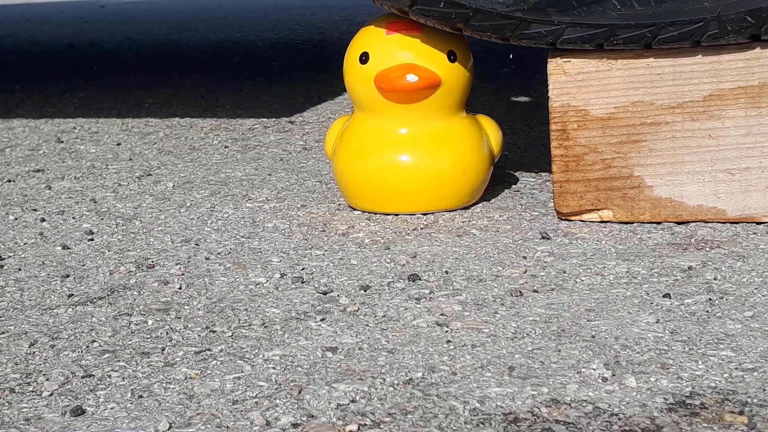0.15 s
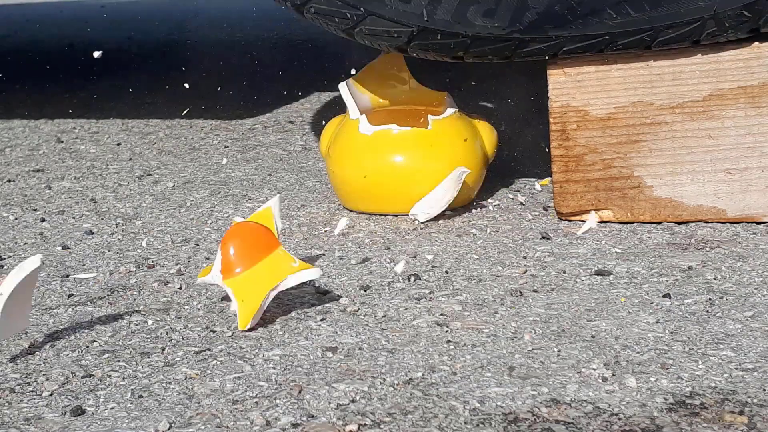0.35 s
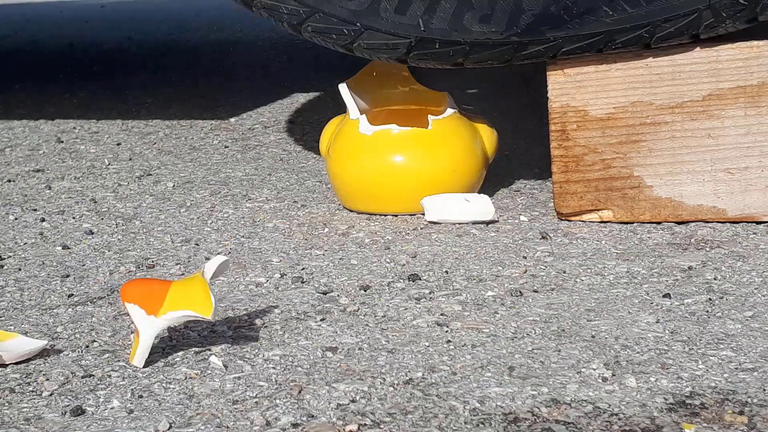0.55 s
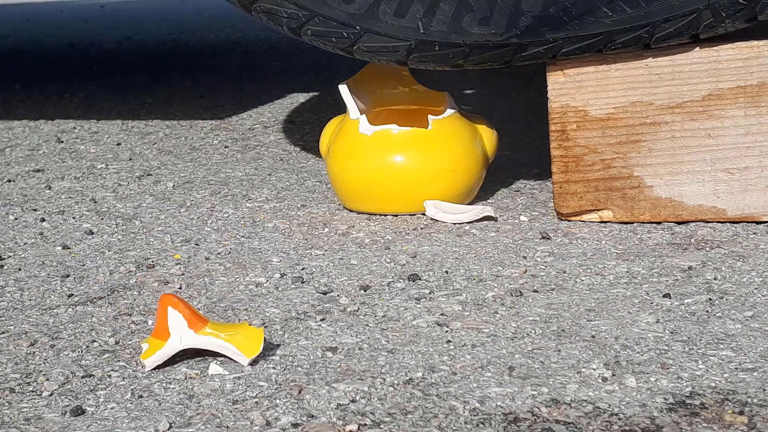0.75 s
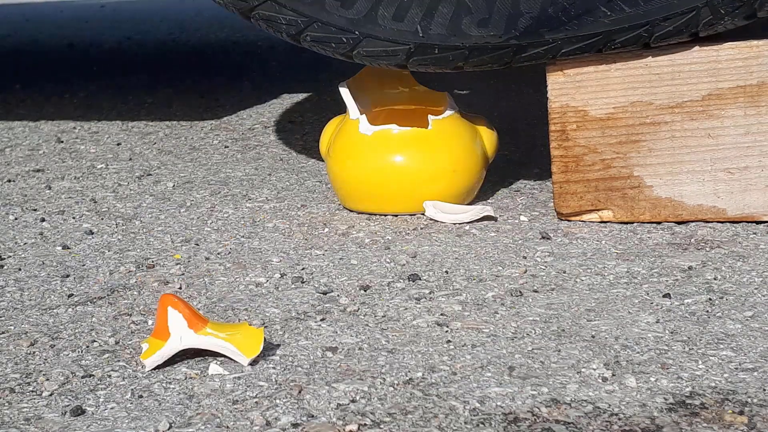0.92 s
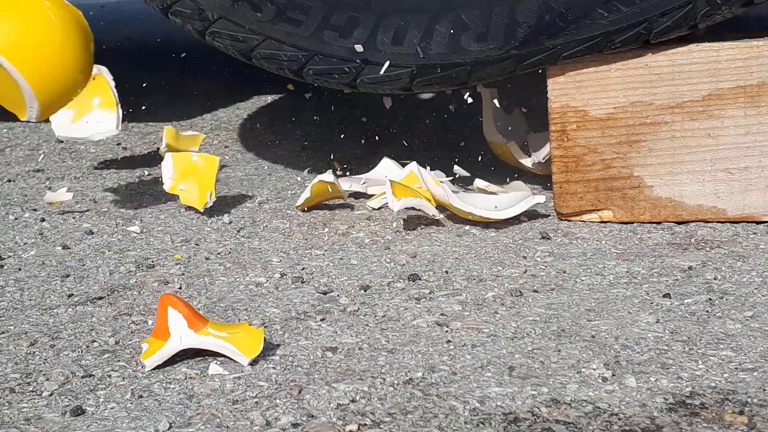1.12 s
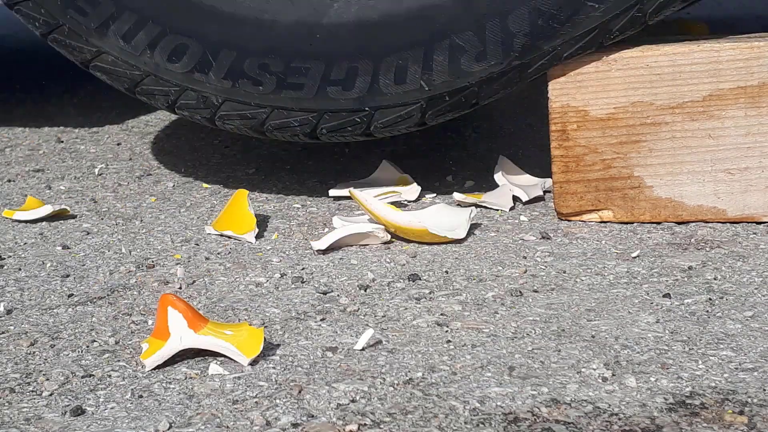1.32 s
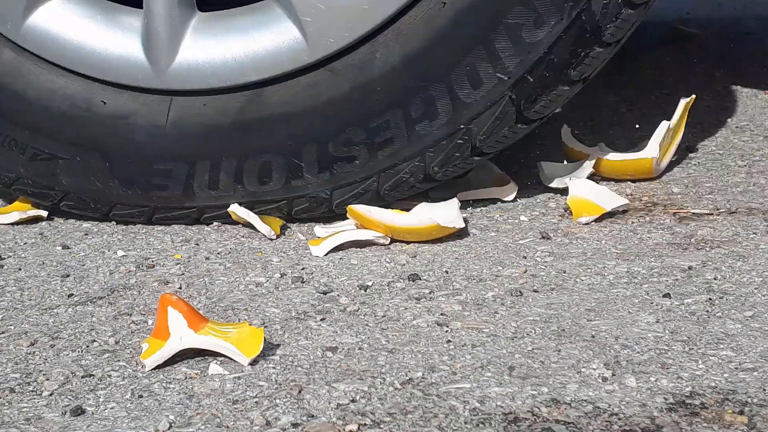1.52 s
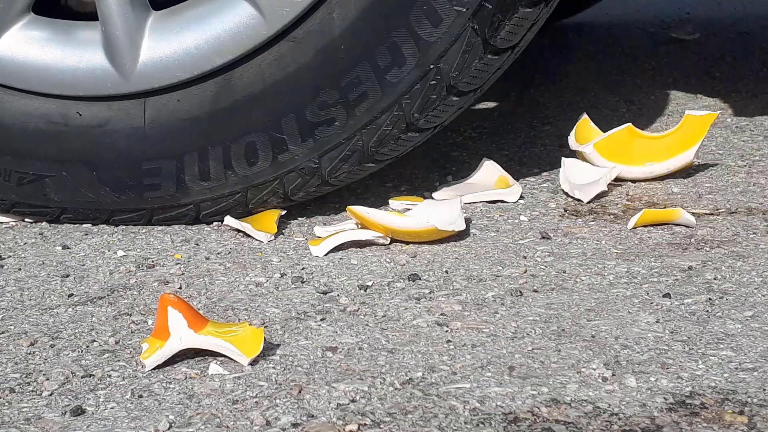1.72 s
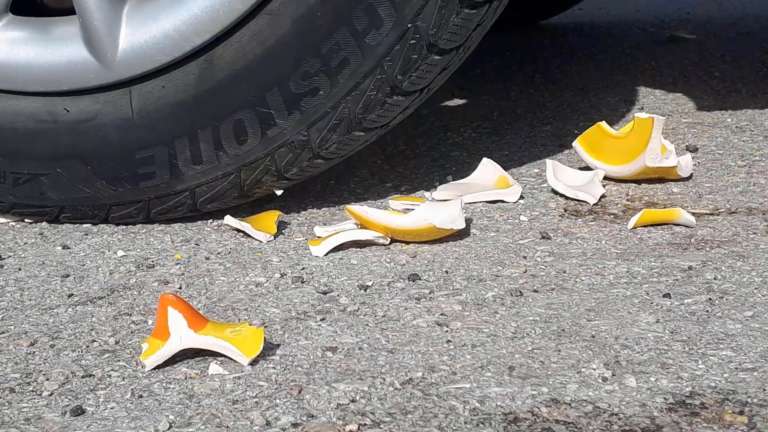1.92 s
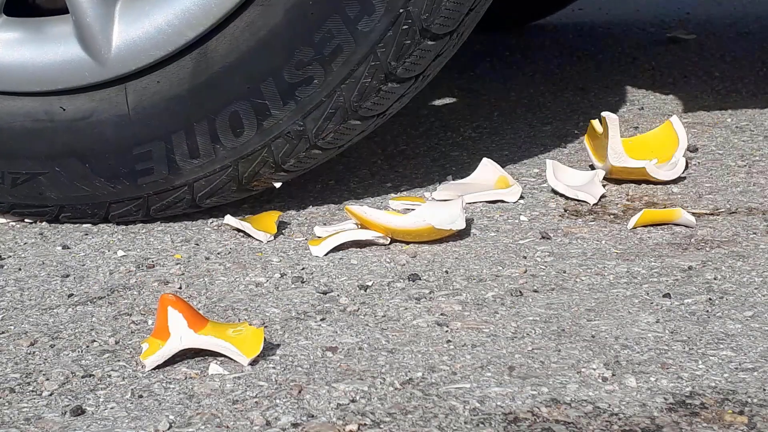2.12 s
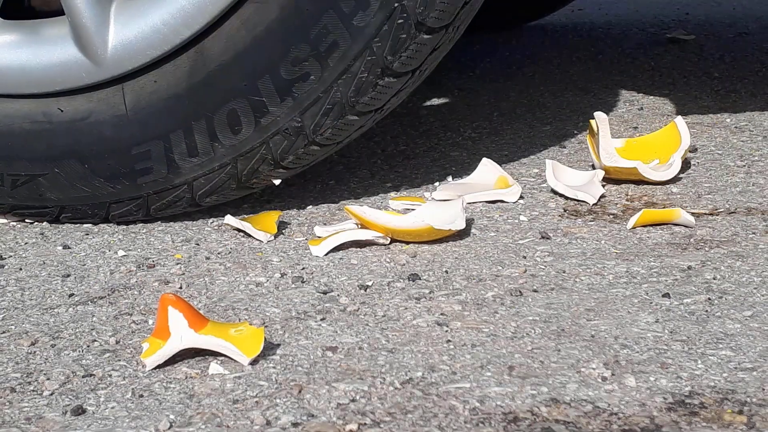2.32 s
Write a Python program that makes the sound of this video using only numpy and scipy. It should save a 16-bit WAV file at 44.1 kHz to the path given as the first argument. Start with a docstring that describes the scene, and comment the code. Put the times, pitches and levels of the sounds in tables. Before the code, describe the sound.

Ceramic shatters under a car tyre, heard close on asphalt. An engine idles low, then at 0.23 s a loud, hollow crack bursts into bright splinters, with a brief tyre hum. Shards clink and tick sparsely until 1.0 s over a fainter engine. A second smash hits at 1.1 s, a sharp clink at 1.38, tyre thud and crunching around 1.5-1.8, then faint rocking rattles until 2.3.

```python
"""An engine idles close by; a hollow ceramic figure breaks twice under a car tyre on asphalt, then the tyre
drops to the ground and grinds the pieces. Bursts of crackling noise, snaps and pings make the breaks; shards land
and ring as decaying sines, with dry ticks and crumbs; the bowl-shaped base rocks to rest in a chord of modes.
The air in the tyre hums after the jolts. The engine, low sines over gated noise, is fainter after the first break."""
import sys
import numpy as np
from scipy import signal
from scipy.fft import rfft, irfft, next_fast_len
from scipy.io import wavfile
from scipy.ndimage import map_coordinates

SR = 44100
rng = np.random.default_rng(int(sys.argv[2]) if len(sys.argv) > 2 else 0)


def waveform_to_disk(signal):
    """Save audio, clipped to [-1, 1], as 16-bit WAV at the path in sys.argv[1]."""
    frames = np.transpose(np.atleast_2d(signal))
    scaled = np.clip(frames, -1, 1) * 32767
    samples = np.round(scaled).astype(np.int16)
    wavfile.write(sys.argv[1], SR, samples)


N = 103635
T = np.arange(N) / SR  # s


def amp(db):
    """Decibels to a linear gain."""
    return 10 ** (np.asarray(db) / 20)


def unit(x):
    """x scaled to an rms of 1."""
    return x / np.sqrt(np.mean(x ** 2) + 1e-20)


def along(points, hz):
    """Interpolates (frequency [Hz], value) points on a log frequency axis."""
    point_hz, value = np.transpose(points)
    return np.interp(np.log(hz + 1), np.log(point_hz + 1), value)


def wobble(rate):
    """A smooth random curve, rate knots a second."""
    knots = rng.standard_normal(int(N * rate / SR) + 4)
    return map_coordinates(knots, [T * rate])


def filtered(x, response):
    """Shapes the spectrum of x by a response of frequency."""
    size = next_fast_len(N + 8192)
    hz = np.fft.rfftfreq(size, 1 / SR)
    return irfft(rfft(x, size) * response(hz), size)[..., :N]


def band(x, lo_hz, hi_hz):
    """Causal band-pass."""
    return signal.sosfilt(signal.butter(2, [lo_hz, hi_hz], "bandpass", fs=SR, output="sos"), x)


# How alike left and right are: (frequency [Hz], likeness [0-1])
STEREO_LIKENESS = [(30, 1), (120, 1), (1000, 0.57), (8000, 0.46), (16000, 0.32)]


def noise():
    """White stereo noise, mixed from mid and side so the channels are less alike at high frequencies."""
    def mid_side_gains(hz):
        angle = np.arccos(np.clip(along(STEREO_LIKENESS, hz), 0, 1)) / 2
        return np.array([np.cos(angle), np.sin(angle)])

    mid, side = filtered(rng.standard_normal((2, N)), mid_side_gains)
    return np.array([mid + side, mid - side])


RISE_CYCLES = 0.32  # time constant of the attack: a ring builds up over about a cycle


def add(out, s, db, hz, t60, pan_db):
    """Adds one struck mode: a decaying sine, panned by its left over right level."""
    start, t = round(s * SR), T[:round(1.2 * t60 * SR)]
    decay = amp(db - 60 * t / t60)
    ring = decay * (1 - np.exp(-t * hz / RISE_CYCLES)) * np.sin(2 * np.pi * hz * t)
    sides = amp([[pan_db / 2], [-pan_db / 2]])
    out[:, start:start + len(t)] += (sides * ring)[:, :N - start]


PING_SPREAD, PING_PAN_DB = 0.77, 2.5  # scatter of log pitch; scatter of each side's level, opposite ways
PING_SIZE_DB, PING_MAX_DB = 8.5, 12  # mean of the random size before the cap; the cap


def pings(count, centre_hz, life_cycles):
    """Many tiny damped sines of random time, pitch, life, size and place, rms 1."""
    u, g = rng.random((count, 3)), rng.standard_normal((count, 2))
    hz = np.clip(centre_hz * np.exp(PING_SPREAD * g[:, :1]), 500, 16000)
    k = np.arange(600)  # samples in a ping
    cycles = hz * k / SR
    size = amp(np.minimum(-PING_SIZE_DB * np.log(u[:, 1:2]), PING_MAX_DB))
    life = life_cycles * (0.076 + u[:, 2:] ** 2)
    fade = 1 - k / len(k)
    ping = size * np.exp(-cycles / life) * np.sin(2 * np.pi * cycles) * fade
    at = ((u[:, :1] * N).astype(int) + k).ravel()
    sides = [amp(side * PING_PAN_DB * g[:, 1:]) for side in (1, -1)]
    return unit(np.array([np.bincount(at, (ping * gain).ravel())[:N] for gain in sides]))


# Breaks and grinding bursts: (time [s], rise [s], hold [s], body and crack t60 [s],
# thump level [dB], body level [dB], crack level [dB], splinter level [dB])
BURSTS = [(0.2333, 0.0011, 0.0034, 0.025, -57, -46, -30, -28.5),
          (0.247, 0.00089, 0.003, 0.07, -53, -11, -14.5, -25),
          (0.293, 0.0053, 0.04, 0.17, -13, -16.5, -16, -14.5),
          (0.395, 0.0012, 0.007, 0.2, -48, -31.5, -37.5, -20.5),
          (1.106, 0.001, 0.013, 0.16, -20, -20, -16, -15.5),
          (1.492, 0.038, 0.0075, 0.056, -30, -22, -23.5, -25),
          (1.535, 0.0023, 0.008, 0.051, -31, -14.5, -29, -48),
          (1.565, 0.0015, 0.011, 0.5, -29, -33.5, -38.5, -42.5),
          (1.613, 0.0018, 0.026, 0.035, -60, -29, -28.5, -48),
          (1.652, 0.0012, 0.063, 0.14, -47, -31.5, -41, -52),
          (1.727, 0.0019, 0.025, 0.038, -36.5, -29.5, -42, -45),
          (1.778, 0.0032, 0.014, 0.24, -68, -36, -34.5, -44)]
# Thump, body, crack and splinter bands: (low edge [Hz], high edge [Hz])
BURST_BANDS = [(95, 342), (300, 1300), (1700, 5250), (6000, 18100)]
# Short knocks of the thick walls, small chips and the tyre: (time [s], level [dB], pitch [Hz], t60 [s])
WALL_KNOCKS = [(0.2495, -13.5, 382, 0.089), (0.2475, 11, 2160, 0.002), (.297, -4.5, 751, 0.045),
               (.305, -13.5, 487, 0.18), (0.316, -15.5, 91, 0.12), (0.332, -12, 117, .15),
               (0.35, -17, 161, 0.22), (.475, -30, 109.7, 0.19), (1.108, -7.5, 192, 0.073),
               (1.107, 5, 1047, 0.0075), (1.149, -21, 114.6, 0.18), (1.375, 2.5, 2660, 0.007),
               (1.392, -24, 10740, 0.046), (1.413, -33, 10740, 0.063), (1.534, -8, 4905, 0.02),
               (1.543, -10.5, 1424, 0.015), (1.539, -12, 245, 0.057), (1.598, -21, 144, 0.12),
               (1.615, -25.5, 70, 0.17), (1.675, -16.5, 636, 0.032), (1.677, -18.5, 332, 0.052),
               (1.74, -28, 1124, 0.022), (1.79, -20.5, 420, 0.017), (1.819, -6, 570, 0.0046),
               (1.9087, -3.5, 1060, 0.0036), (2.229, -20.5, 1920, 0.0056), (2.274, -19.5, 2070, 0.0088),
               (2.283, -25.5, 108, 0.076), (2.307, -21, 125, 0.062)]
T60_FACTORS = [1.27, 1, 1, 0.68]  # thump, body, crack, splinter
CRACKLE_HZ, CRACKLE_DB = 907.7, 5  # grain rate and depth of the noise
CHIP_COUNT, CHIP_DB, CHIP_HZ, CHIP_CYCLES = 2400, -9, 4525, 120  # ringing chips, level over the noise
GRIT_COUNT, GRIT_DB, GRIT_HZ, GRIT_CYCLES = 1600, -5.5, 3600, 1.9  # crisp snaps, level over the noise
KNOCK_PAN_DB = 2  # scatter of left over right


def breaks():
    """Each burst rises, holds and dies in four bands of crackling noise, snaps and ringing chips; knocks stand out."""
    out = np.zeros((2, N))
    chips = amp(CHIP_DB) * pings(CHIP_COUNT, CHIP_HZ, CHIP_CYCLES)
    snaps = amp(GRIT_DB) * pings(GRIT_COUNT, GRIT_HZ, GRIT_CYCLES)
    for k, (lo_hz, hi_hz) in enumerate(BURST_BANDS):
        shape = np.zeros(N)
        for s, rise, hold, t60, *db in BURSTS:
            attack = np.clip((T - s) / rise, 0, 1) ** 2
            dying_s = np.maximum(T - s - rise - hold, 0)
            shape += attack * amp(db[k] - 60 * dying_s / (t60 * T60_FACTORS[k]))
        crackle = unit(noise() * amp(CRACKLE_DB * wobble(CRACKLE_HZ)))
        out += shape * unit(band(crackle + chips + snaps, lo_hz, hi_hz))
    for knock, side in zip(WALL_KNOCKS, rng.standard_normal(len(WALL_KNOCKS))):
        add(out, *knock, KNOCK_PAN_DB * side)
    return out


# Landing shards, before the flutter: (time [s], level [dB], pitch [Hz], t60 [s], left over right [dB])
SHARD_RINGS = [(0.2995, -10.5, 3450, 0.028, 0), (0.301, -10.5, 2548, 0.15, 3), (0.314, -6, 2560, 0.08, -1),
               (0.3043, -13.5, 7920, 0.046, -10), (0.312, -4.5, 5060, 0.045, 4),
               (0.3106, -5.5, 6130, 0.057, -5), (0.342, -14, 4390, 0.073, 0),
               (0.3495, -9.5, 5620, 0.052, 5.5), (0.353, -13.5, 10560, 0.026, 3),
               (0.383, -27.5, 5560, 0.19, 3), (0.4, -31, 10930.0, 0.05, -9),
               (0.3981, -13.5, 12900, 0.037, 3), (0.4, -12, 13800, 0.056, -8),
               (0.4235, -21, 10750, 0.025, -2), (0.423, -10, 5010, 0.029, 2),
               (0.4516, -18.5, 5540, 0.038, 6), (0.403, -18, 4650, 0.012, 2),
               (0.456, -11, 13300, 0.032, -8), (0.508, -23, 14300, 0.024, -2),
               (0.5086, -21.5, 10140, 0.016, 1), (0.5445, -40, 10660.0, 0.021, -17),
               (0.5598, -13.5, 13830, 0.013, -8), (0.5774, -29.5, 7700, 0.014, -6),
               (0.578, -38, 10600, 0.05, -1.5), (0.5786, -33, 5500, 0.034, 6),
               (0.6665, -25, 13800, 0.02, -4), (0.6666, -13.5, 4978, 0.043, 8.5),
               (0.68, -44, 10400, 0.036, 0), (0.6935, -17.5, 4943, 0.047, 5.5),
               (0.712, -37, 10300, 0.092, -2), (0.7125, -32, 13800, 0.037, -14),
               (0.7357, -31, 13640, 0.031, -9), (0.76, -42, 10600, 0.11, -2), (0.8124, -34, 7810, 0.05, -9),
               (0.8292, -26.5, 4940, 0.079, 6), (0.843, -39, 12600, 0.045, 8),
               (0.882, -36, 13840, 0.034, -8), (0.9063, -35, 14300, 0.028, 7),
               (0.92, -35.5, 6960, 0.12, -4), (0.9215, -45, 10770.0, 0.13, 5),
               (0.9499, -32, 4900, 0.058, 7), (1.028, -14.5, 2540, 0.015, -4), (1.03, -33, 4980, 0.12, 5),
               (1.11, -7.5, 5200, 0.019, 1), (1.118, -8, 4830, 0.025, 5), (1.1217, -4, 3173, 0.074, 3),
               (1.135, -13, 4965, 0.038, 9), (1.134, -15, 4040, 0.028, 11), (1.15, -32, 3135, 0.1, 6),
               (1.1241, -14, 12400, 0.064, -1), (1.13, -19, 7020, 0.057, -18),
               (1.133, -14.5, 2412, 0.12, -2), (1.1631, -26, 15530.0, 0.05, -4),
               (1.202, -21, 3650, 0.067, 3), (1.201, -44, 8900, 0.066, 1), (1.2161, -28, 14440, 0.082, -4),
               (1.229, -38, 7230, 0.092, -16), (1.238, -22.5, 1757, 0.036, 1),
               (1.24, -23.5, 4000, 0.045, 1), (1.2396, -37, 13500, 0.059, 1),
               (1.243, -38, 8710.0, 0.057, -11), (1.2485, -49, 5016, 0.22, 15),
               (1.2906, -34, 15900, 0.062, -4), (1.292, -27, 2870, 0.035, 0), (1.2906, -25, 1690, 0.031, 4),
               (1.292, -34.5, 6900, 0.063, -8), (1.2965, -36, 11900, 0.045, 6),
               (1.3087, -20.5, 4940, 0.032, 2.5), (1.3103, -30.5, 10100, 0.039, -6),
               (1.334, -33, 2970, 0.062, 0), (1.3763, -23, 5195, 0.03, 7), (1.4133, -38, 15290.0, 0.11, 2),
               (1.4158, -37.5, 5010, 0.12, 20), (1.58, -31, 7570, 0.026, -9), (1.6182, -24.5, 1260, 0.2, 5),
               (1.758, -34, 1194, 0.087, -7), (1.822, -35, 1240, 0.05, -13),
               (1.8763, -32.5, 8760, 0.025, 2)]
# Modes of the bowl-shaped base: (pitch [Hz], relative level [dB], t60 [s], left over right [dB])
BASE_MODES = [(2412, -0.5, 0.2, 5), (3157, -6, 0.1, 11.5), (5240, -6.5, 0.07, 14), (8310, -18.5, 0.066, -5),
              (10740, -26, 0.039, 12), (12200, -22, 0.081, 3)]
# Blows on the rocking base, before scatter and flutter:
# (time [s], level [dB], extra on the lowest mode [dB], extra on the three highest modes [dB])
BASE_BLOWS = [(1.375, -9.5, -16.5, -3), (1.411, -22, -20, -14), (1.617, -25.5, 7, 2), (1.645, -33, 10, -5),
              (1.69, -45.5, 16, 4), (1.79, -35, 4, -16), (1.96, -51, 6, 4), (1.978, -52.5, 12, 33),
              (1.995, -47, 11, 0), (2.011, -45.5, 8.5, 2), (2.039, -41.5, 3.5, 12), (2.101, -58, -16, 21),
              (2.142, -48.5, -26, 16), (2.232, -34, -8, 0), (2.253, -39, -9, -2), (2.265, -32, -9, -16),
              (2.276, -35, -18, 1), (2.293, -42.5, 11, -5), (2.315, -40.5, -16, 6)]
FLUTTER_DB, FLUTTER_HZ = 1.6, 200  # depth and rate of the level's random flutter


def shards():
    """Landing shards ring on one pitch each; the base rings with all its modes, a little differently each blow."""
    out = np.zeros((2, N))
    for ring in SHARD_RINGS:
        add(out, *ring)
    chance = rng.standard_normal((len(BASE_BLOWS), len(BASE_MODES)))
    for (s, db, low_db, high_db), scatter in zip(BASE_BLOWS, chance):
        for k, (hz, mode_db, t60, pan_db) in enumerate(BASE_MODES):
            blow_db = db + low_db * (k == 0) + high_db * (k > 2)
            add(out, s, blow_db + mode_db + 1.8 * scatter[k], hz, t60, pan_db)
    return out * amp(FLUTTER_DB * wobble(FLUTTER_HZ))


# Dry contact ticks: (time [s], level before TICK_DB [dB], clack pitch [Hz], treble noise over the clack [dB])
CONTACT_TICKS = [(0.3471, -3, 4600, -16), (0.3889, -4.5, 2260, -15), (0.4227, -24, 4620, -25),
                 (0.4476, -13.5, 2340, -6), (0.455, -14, 4900, -10), (0.498, -29, 4540, -2),
                 (0.5079, -39, 1940, -25), (0.5406, -20.5, 4960, -8), (0.557, -23, 2830, -0.5),
                 (0.5773, -21, 2410, -15), (0.6165, -30.5, 1740, -1.5), (0.6652, -12, 3000, -11.5),
                 (0.685, -17.5, 2500, -7.5), (0.6931, -14, 4670, -12.5), (0.7035, -15.5, 2920, -11),
                 (0.7357, -30, 2600, -2.5), (0.7454, -31, 1800, -12), (0.813, -12.5, 4700, -17),
                 (0.8288, -5.5, 4700, -21), (0.875, -20.5, 5100, -12.5), (0.9053, -36.5, 4530, -16),
                 (0.9195, -12.5, 4400, -15), (0.976, -35, 2430, 1), (1.0263, 0.5, 2560, -15),
                 (1.178, -15, 2950, -26), (1.196, -9, 2450, -18), (1.2, -11.5, 4300, -13.5),
                 (1.2143, -24, 3630, -16), (1.2384, -18, 4020, -4), (1.2615, -31, 3600, -29),
                 (1.281, -18.5, 1750, -6), (1.2909, -13, 1500, -17), (1.3118, -16.5, 1720, -13),
                 (1.3338, -13, 2760, -25), (1.376, -4, 3100, -9.5), (1.4132, -10.5, 3290, -7),
                 (1.51, -20, 2970, 3), (1.57, -12, 2510, -13.5), (1.6029, -8, 1840, -30),
                 (1.6167, -1, 2370, -12.5), (1.6308, -4, 2280, -20), (1.642, -4, 3750, -25),
                 (1.6478, -4, 2040, -13), (1.671, -13.5, 2200, -6.5), (1.712, -11.5, 2290, -12.5),
                 (1.7298, -9, 1300, -12.5), (1.7402, -6.5, 1300, -20.5), (1.7747, -13, 1930, -15),
                 (1.7906, 0, 2180, -20.5), (1.8188, -19.5, 2360, -19), (1.838, -27, 2410, -14),
                 (1.8655, -22, 2320, -9.5), (1.8884, -14.5, 2300, -15), (1.9084, -10.5, 1680, -11),
                 (1.9594, -24, 2350, -13), (1.9793, -8, 2200, -21), (2.0103, -13, 2110, -23),
                 (2.1142, -31, 4080, -4.5), (2.2304, -29, 2970, -23), (2.2545, -8, 2100, -42),
                 (2.266, -7, 2320, -34), (2.2717, -32, 2500, -25), (2.2934, -29, 2440, -23)]
TICK_DB, CLACK_T60 = -9, 0.0068  # level of all ticks; t60 of the pitched part, s
MID_DB = 3.5  # mid noise over treble noise
TICK_T60, SCRAPE_DB, SCRAPE_T60 = 0.017, -18.5, 0.053  # noise t60, s; scrape over the burst, dB; its t60, s


def ticks():
    """A short pitched clack plus a noise burst in two bands with a fainter scrape after it."""
    s, db, clack_hz, treble_db = np.transpose(CONTACT_TICKS)
    t, out = T[:SR // 10], np.zeros((2, N))
    for clack in zip(s, db + TICK_DB, clack_hz):
        add(out, *clack, CLACK_T60, 0)
    shape = amp(-60 * t / TICK_T60) + amp(SCRAPE_DB - 60 * t / SCRAPE_T60)
    at = np.round(s * SR).astype(int)
    for part_db, (lo_hz, hi_hz) in zip([treble_db + MID_DB, treble_db], BURST_BANDS[2:]):
        blows = np.bincount(at, amp(db + part_db + TICK_DB), N)
        burst = signal.fftconvolve(blows, shape)[:N] * noise()
        # make up the level lost outside the band
        out = out + band(burst, lo_hz, hi_hz) * np.sqrt(SR / 2 / (hi_hz - lo_hz))
    return out


# Level of the skittering crumbs: (time [s], level [dB])
CRUMB_LEVELS = [(0.299, -20.5), (.5, -53), (0.649, -52), (.8, -56), (1.09, -58), (1.159, -38.5),
                (1.35, -39.5), (1.48, -48), (1.6, -75), (1.8, -51), (1.95, -59), (2.35, -58)]


def crumbs():
    """Small debris skittering over the road as a shower of tiny pings that swells and thins."""
    s, db = np.transpose(CRUMB_LEVELS)
    shower = pings(4500, centre_hz=7054, life_cycles=23)
    return shower * amp(np.interp(T, s, db)) * (T > s[0])


# Jolts of the tyre: (time [s], level [dB])
TYRE_JOLTS = [(0.327, -17), (1.114, -28)]


def tyre():
    """The air in the tyre hums after each jolt, one decaying sine."""
    out = np.zeros((2, N))
    for s, db in TYRE_JOLTS:
        add(out, s, db, hz=250.6, t60=0.67, pan_db=0)
    return out


# Engine course: (time [s], level [dB], hiss over that level before HISS_DB [dB])
ENGINE_COURSE = [(0, -30, -2), (0.099, -30.5, 1), (.23, -31, -0.5), (.45, -41.5, 0), (.7, -47, 1),
                 (1.101, -46.5, -0.5), (1.25, -47.5, 5), (1.499, -46.5, -0.5), (1.9, -43, -4.5),
                 (2.35, -48, 2)]
# Sines of the hum before their wavering: (multiple of the firing rate, relative level [dB])
HUM_ORDERS = [(1, -11), (2, -5), (3, -1.5)]
# Spectrum of the hiss before levelling: (frequency [Hz], relative density [dB per Hz])
HISS_SPECTRUM = [(25, -15), (60, -8.5), (130, -13), (200, -8), (500, -10.5), (1000, -14.5), (1600, -22),
                 (2550, -19.5), (3500, -28), (5500, -31), (6200, -41), (16000, -45.5)]
FIRING_HZ, WAVER_HZ = 44.14, 1.138  # centre of the firing rate; size of its random waver
HISS_DB, GATING = 0.5, 0.14  # added hiss level; depth of its swell with each firing


def engine():
    """Low firing orders over noise that swells with each firing."""
    s, level_db, hiss_db = np.transpose(ENGINE_COURSE)
    turn = 2 * np.pi * np.cumsum(FIRING_HZ + WAVER_HZ * wobble(7.94)) / SR
    hum = np.zeros((2, N))
    for k, db in HUM_ORDERS:
        side_db = 1.3 * np.array([wobble(8.86), wobble(9.43)])
        hum += amp(db + 2.3 * wobble(23.84) + side_db) * np.sin(k * turn + k * k)
    hiss = unit(filtered(noise(), lambda hz: amp(along(HISS_SPECTRUM, hz))))
    hiss = hiss * (1 + GATING * np.cos(turn))
    hiss_gain = amp(HISS_DB + np.interp(T, s, hiss_db) + 0.61 * wobble(20))
    return amp(np.interp(T, s, level_db)) * (hum + hiss_gain * hiss)


CAR_DB, CAR_T60, CAR_DELAY_S = -9.5, 0.088, 0.0033  # echo under the car: level, t60 in s, delay


def scene():
    """The breaking sounds echo briefly between car and road; tyre hum and engine join without echo."""
    near = breaks() + shards() + ticks() + crumbs()
    t = T[:SR // 8]
    tail = noise()[:, :len(t)] * amp(-60 * t / CAR_T60) * (t > CAR_DELAY_S)
    tail = tail / np.linalg.norm(tail[0])
    echo = signal.fftconvolve(near.mean(0)[None], tail, axes=1)[:, :N]
    return near + amp(CAR_DB) * echo + tyre() + engine()


LOW_CUT_HZ, TOP_HZ = 45, 16000


def record(dry):
    """The microphone's bass roll-off, soft clipping of the loudest peaks, then the band limit."""
    x = signal.sosfilt(signal.butter(2, LOW_CUT_HZ, "highpass", fs=SR, output="sos"), dry)
    x = x / (1 + np.abs(x / .85) ** 5) ** (1 / 5)
    return filtered(x, lambda hz: hz < TOP_HZ)


dry = scene()
out = record(dry)
waveform_to_disk(out)
```